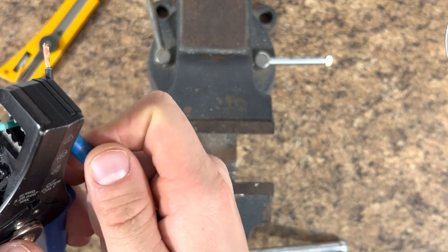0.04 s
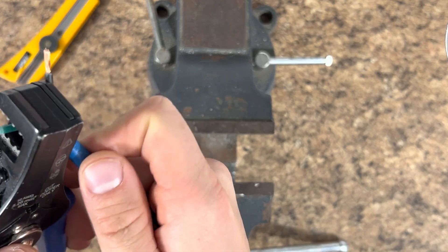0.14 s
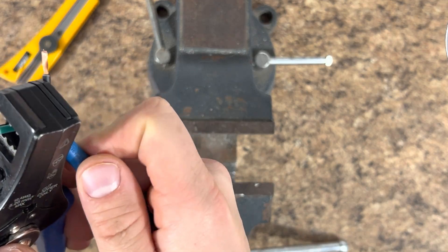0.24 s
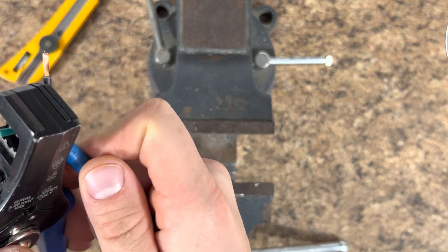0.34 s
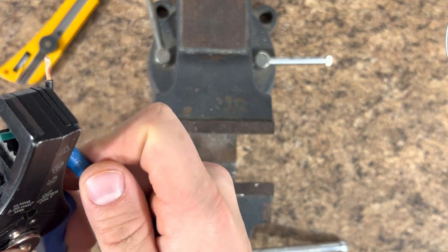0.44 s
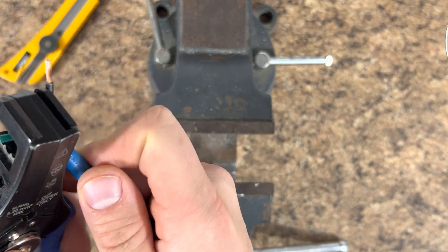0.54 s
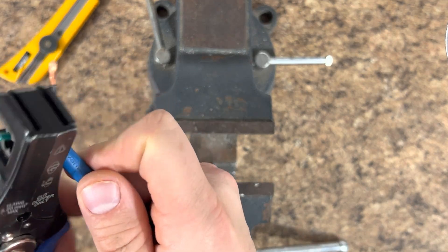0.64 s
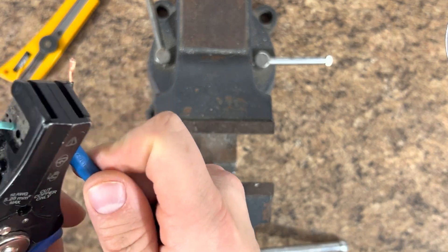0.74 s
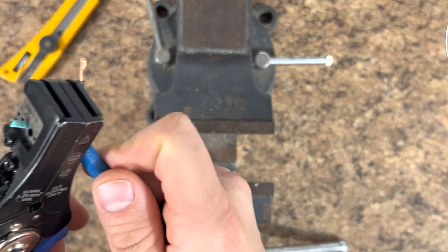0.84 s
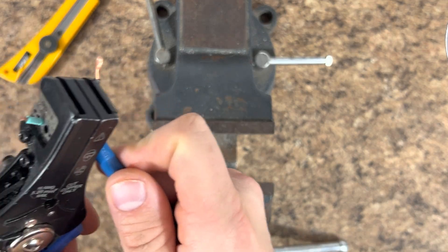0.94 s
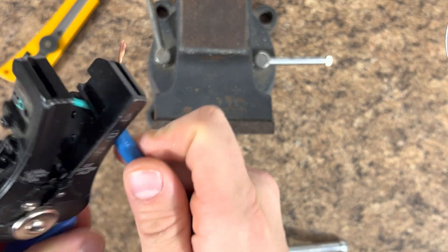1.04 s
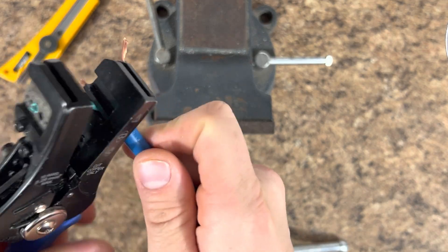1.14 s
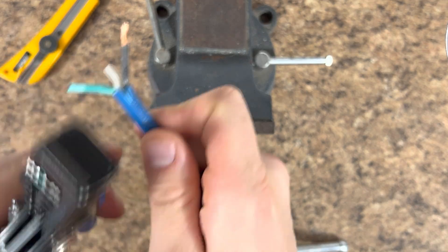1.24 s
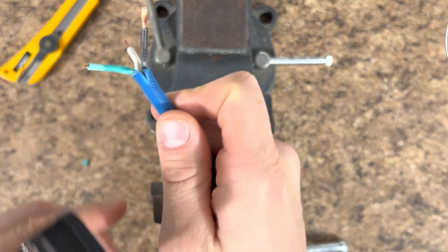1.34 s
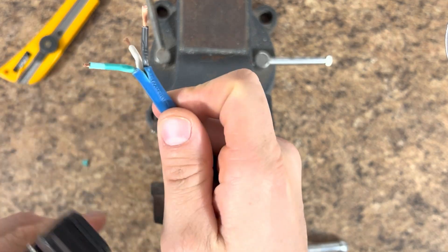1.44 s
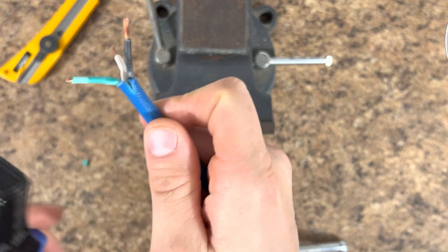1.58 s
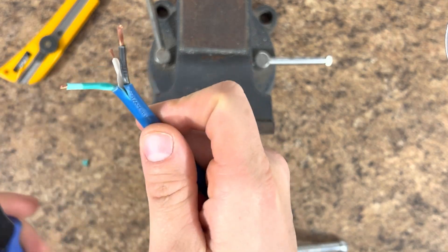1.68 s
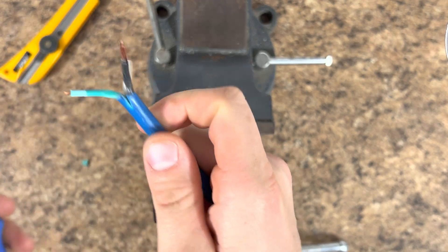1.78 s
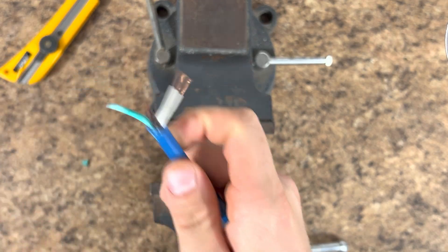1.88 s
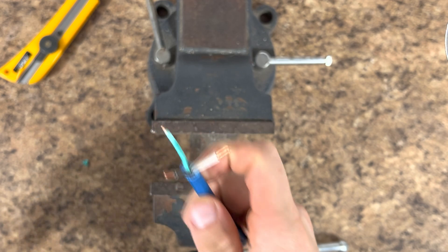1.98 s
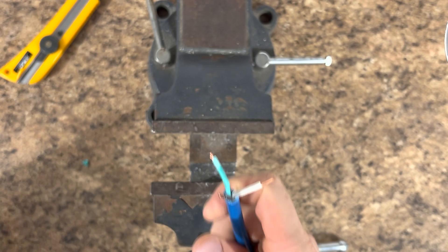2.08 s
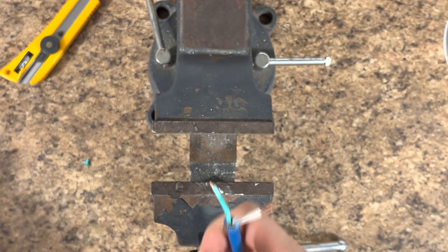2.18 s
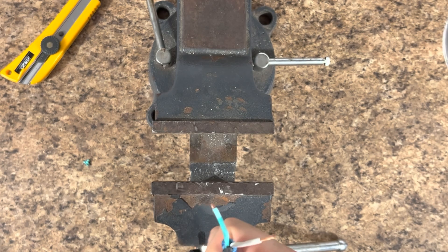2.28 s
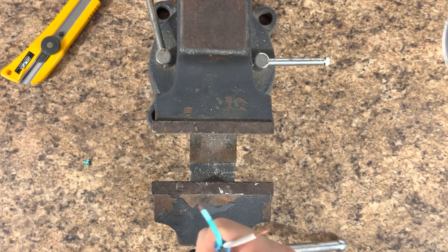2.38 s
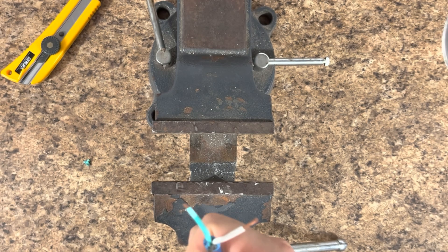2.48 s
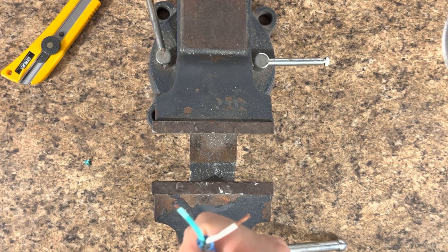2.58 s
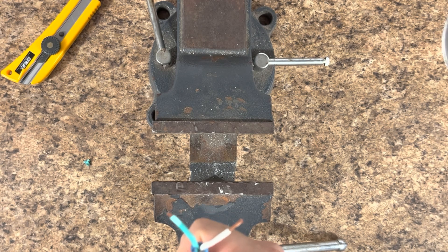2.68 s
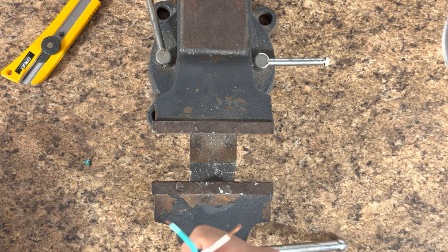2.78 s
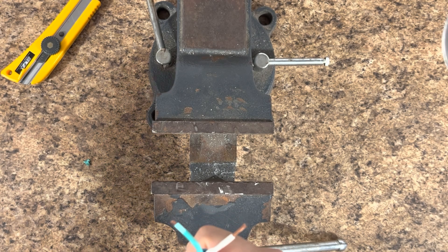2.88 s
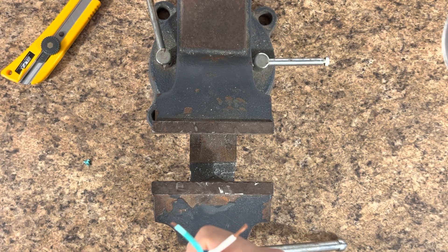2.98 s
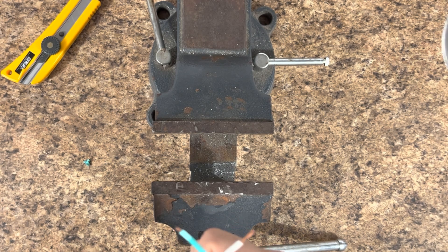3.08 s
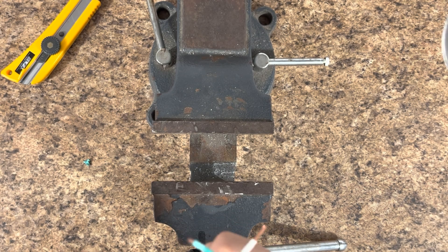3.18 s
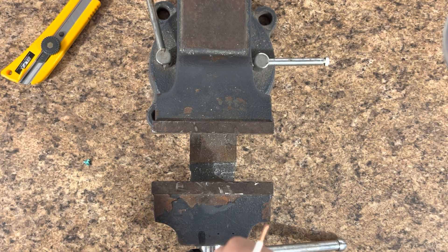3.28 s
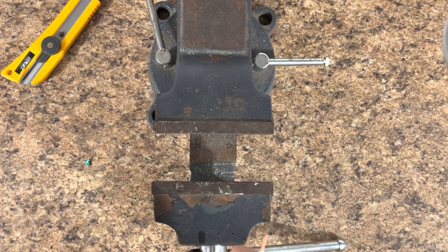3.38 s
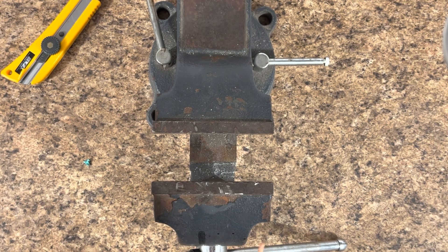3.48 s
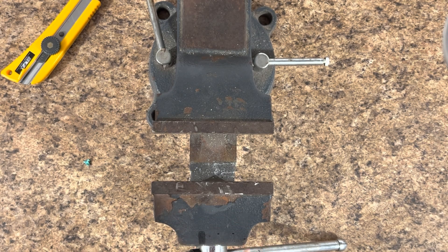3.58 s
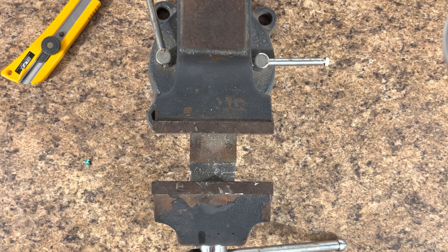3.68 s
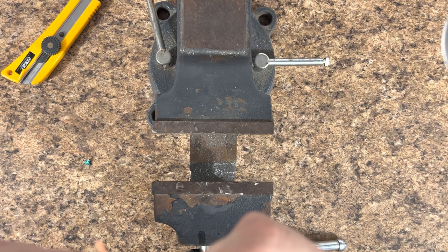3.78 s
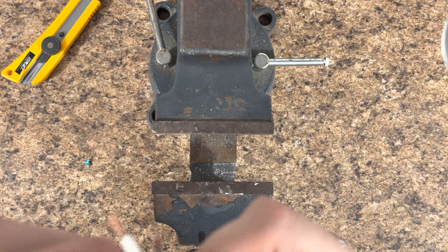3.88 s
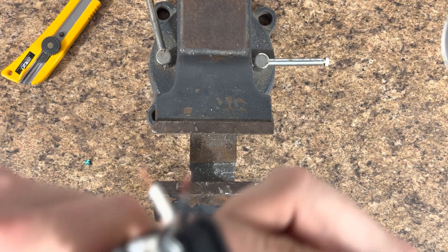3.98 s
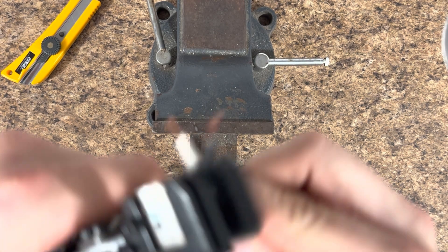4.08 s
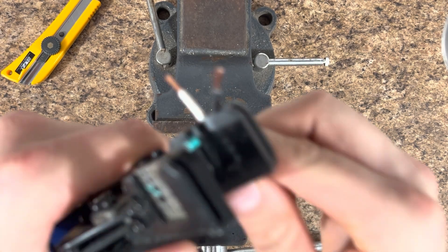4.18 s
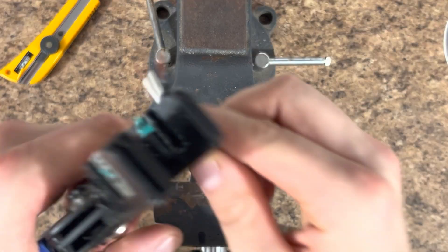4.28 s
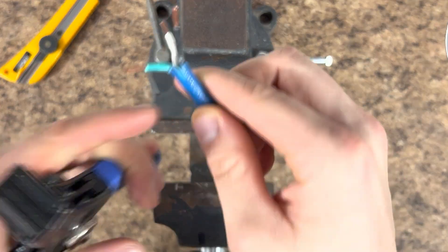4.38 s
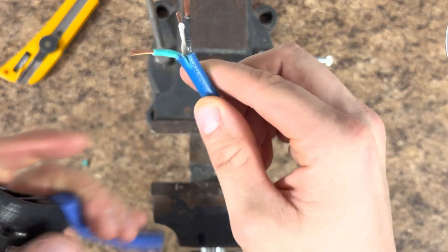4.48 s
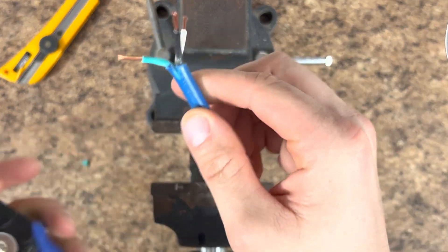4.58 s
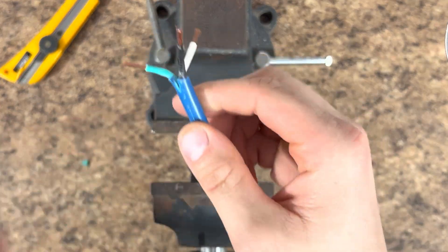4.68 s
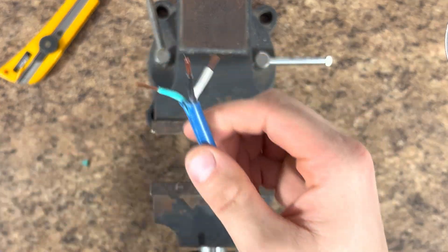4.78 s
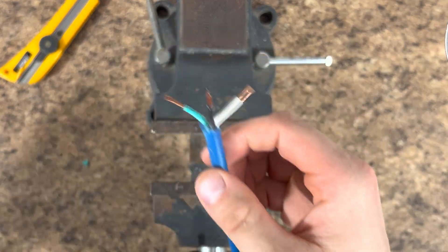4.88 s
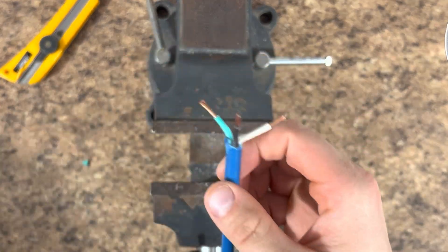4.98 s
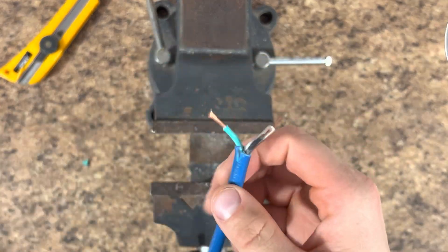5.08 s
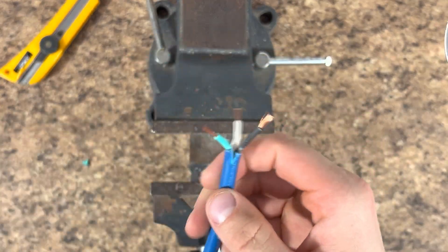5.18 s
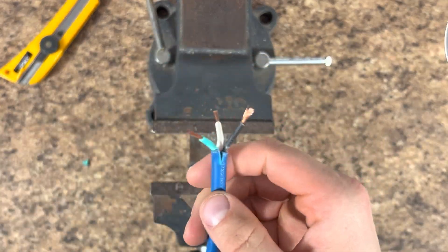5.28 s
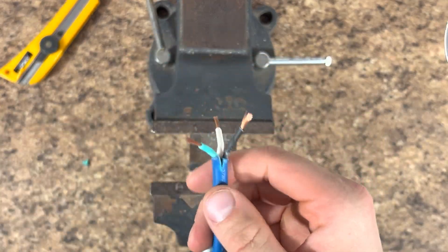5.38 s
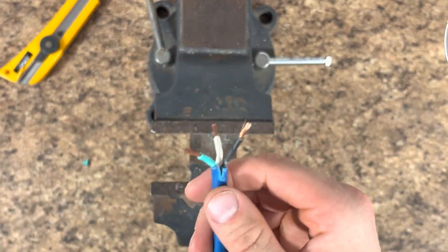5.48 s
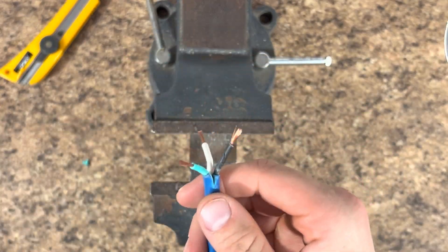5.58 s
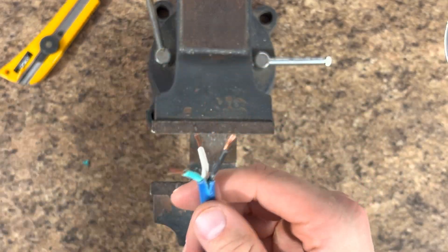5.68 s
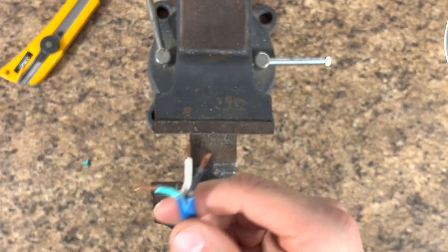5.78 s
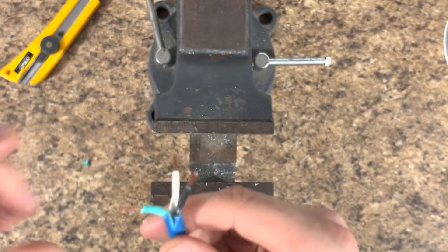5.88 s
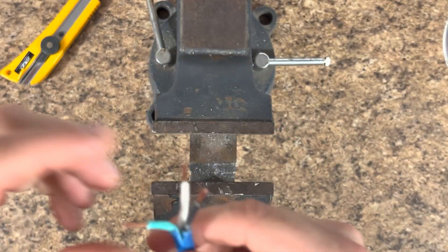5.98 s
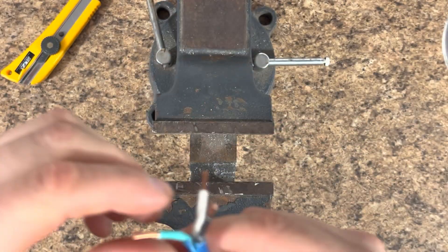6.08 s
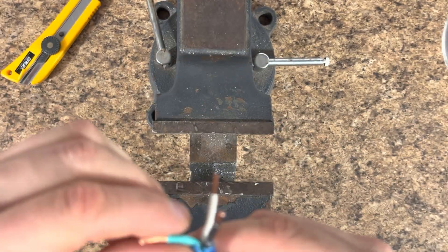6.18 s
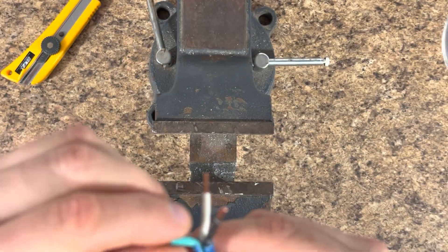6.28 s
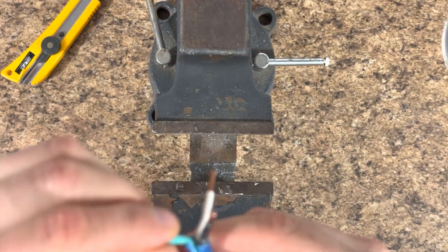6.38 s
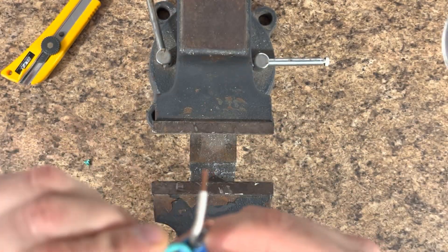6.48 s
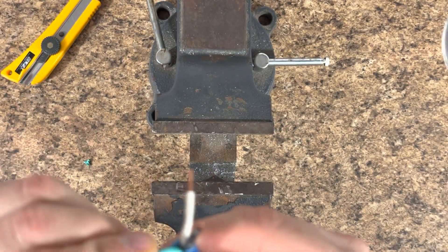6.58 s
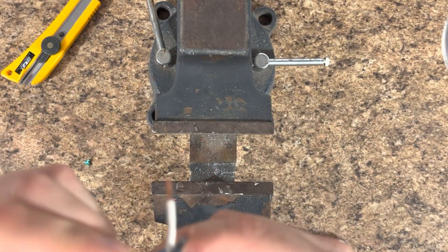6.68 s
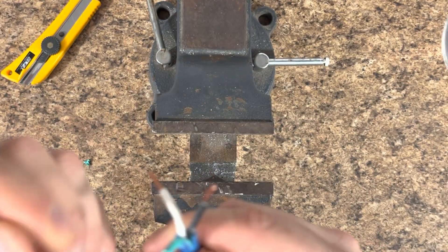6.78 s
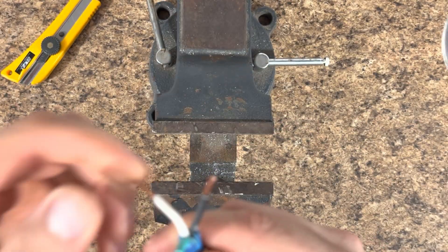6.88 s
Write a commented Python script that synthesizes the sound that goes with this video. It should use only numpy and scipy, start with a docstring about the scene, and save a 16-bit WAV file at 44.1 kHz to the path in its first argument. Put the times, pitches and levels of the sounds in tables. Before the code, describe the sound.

A hand wire stripper clicks and snaps back sharply twice, then knocks down onto a wooden bench, over a low ventilation hum.

```python
"""A workshop, close to a wooden bench. A spring-loaded wire stripper clicks, bites and snaps back:
bright steel cracks over ringing handles and jaws, then a thin spring tone and a clatter of loose parts.
It is laid down with a knock that rings the board. Snaps and knocks jolt the microphone stand, which
then sways. Fingers rustle on the cable, and a ventilation unit hums and rumbles under it all."""
import sys
import numpy as np
from scipy import signal
from scipy.fft import rfft, irfft, next_fast_len
from scipy.io import wavfile

SR = 44100
rng = np.random.default_rng(int(sys.argv[2]) if len(sys.argv) > 2 else 0)


def pcm_store(signal):
    """Save signal as 16-bit PCM."""
    levels = np.round(np.clip(np.atleast_2d(signal), -1, 1) * 32767)
    wavfile.write(sys.argv[1], SR, levels.astype(np.int16).T)


N = 306054
SIZE = next_fast_len(N + SR)
HZ = np.maximum(np.arange(SIZE // 2 + 1) * SR / SIZE, 1)

# steel contacts: t/s, level/dB, handle ring/dB, jaw ring/dB (both rings against the crack)
CONTACTS = [(0.436, -60, -20, -19), (0.527, -57, -26, -30), (0.556, -39, -3.5, -0.5), (.582, -49, -7, 2),
            (0.613, -34.5, -14, -15), (0.6177, -31, -16, -16), (0.651, -47.5, -20, -6),
            (0.664, -44, -15, 0), (0.691, -32.5, -12.5, -15.5), (0.785, -62, -18, 8),
            (.9822, -23.5, -7, -14), (0.985, -27.5, -7.5, -3), (0.9899, -9, -1, -6),
            (1.1428, -30.5, -11, -13.5), (1.1517, -30.5, -25, -22.5), (1.159, -27, -20.5, -20),
            (1.1611, -14, -18.5, -21.5), (1.172, -7.5, -16, -19.5), (1.189, -25.5, -12.5, -16.5),
            (1.191, -9, -12, -11), (1.68, -66, -18, -17), (1.964, -56.5, -25, -16), (3.767, -59, -23, 5),
            (4.1114, -31, -13.5, -17), (4.1349, -11.5, -25.5, -20), (4.149, -14, -10, -6),
            (4.3057, -32.5, -20, -14.5), (4.3105, -28, -11, -16), (4.319, -27.5, -13.5, -4),
            (4.326, -16, -23.5, -10.5), (4.3306, -6, -17.5, -8), (4.3438, -19.5, -14, -5.5),
            (4.3508, -6.5, -27, -1.5), (4.671, -58, -15, 9), (5.14, -71.5, -9.5, 18.5),
            (5.2953, -9, -8.5, -12), (5.902, -55, -14, -26), (5.923, -52, -24, -10),
            (5.942, -55.5, -22, -19), (5.985, -36, -28, -36), (6.015, -52, -17, -16),
            (6.043, -52.5, 8.5, -5), (6.078, -50.5, -19, -7), (6.726, -60, -14, 3),
            (6.779, -64, -23, -13.5)]
# ring of the handles and jaws: f/Hz, level/dB, t60/s
TOOL_MODES = [(464, -19.5, 0.025), (1230, -14.5, 0.0087), (1444, -6.5, 0.014), (2079, -7, 0.014),
              (2510, -10, 0.0039), (3210, -5, 0.0067), (3940, -7.5, 0.0022), (5430, -8, 0.0036),
              (6545, -15, 0.0034)]
# colour of the steel crack: f/Hz, level/dB
CRACK_EQ = [(900, -41), (1500, -19), (3000, -13), (5500, -8), (8000, -2.5), (10300, -5), (12200, 0.5),
            (14200, -2), (15600, -4.5), (16300, -21.5)]
# tails of the snap-backs: t/s, spring tone/dB, clatter/dB
SNAP_BACKS = [(1.192, -47.5, -34), (4.351, -43, -31.5)]
# colour of the loose parts: f/Hz, level/dB
CLATTER_EQ = [(700, -30), (1500, -9), (2800, -2.5), (3200, 3.5), (3700, -1), (4100, 1), (5500, -2),
              (8000, -0.5), (12000, -6.5), (15600, -9.5), (16300, -26.5)]
# blows on the bench: t/s, level at 500 Hz/dB, tilt/(dB per octave), pitch the spot favours/Hz, crack/dB
BLOWS = [(2.527, -31.5, -3, 335, -32), (2.732, -60, -8, 341, -77), (2.952, -69.5, -9.5, 182, -74),
         (5.2915, -20, -1, 192.5, -19.5), (5.734, -57.5, -1, 163, -60), (6.521, -62, -5, 179, -87)]
# ring of the bench top: f/Hz, level/dB, t60/s
BENCH_MODES = [(63.5, -22, 0.89), (90.8, -4.5, 0.3), (128.3, -2.5, 0.27), (149.4, 3, 0.15),
               (185.6, 5, 0.11), (281.5, 11, 0.062), (302.8, -9, 0.12), (364.3, 7.5, 0.092), (451, 1, 0.1),
               (480, 3, 0.015), (649, 7, 0.067), (676, -9, 0.015), (727, -10, 0.048), (923, 15.5, 0.024),
               (976, 1.5, 0.059), (1117, -2.5, 0.087), (1227, -13.5, 0.09), (1304, 0, 0.084),
               (1432, 1, 0.075), (1570, -0.5, 0.01), (1540, 21, 0.0023), (1864, 6.5, 0.011),
               (2340, 13, 0.0066), (2540, -5, 0.019), (3040, 13, 0.0028)]
# jolts running up the stand: t/s, bending wave/dB, sway/dB
STAND_JOLTS = [(.990, -45, -49.5), (1.193, -6, -58), (1.244, -24.5, -20.5), (2.532, -37, -30),
               (4.351, -12, -62.5), (4.41, -54, -28), (5.295, -38.5, -28)]
# finger strokes on the cable jacket: centre t/s, length/s, level/dB
STROKES = [(1.70, 0.085, -76.5), (1.85, .2, -77.5), (2.0, 0.21, -73.5), (2.18, .1, -82), (2.4, 0.19, -82),
           (2.88, 0.13, -84), (3.08, .08, -83), (3.35, 0.37, -85), (3.74, 0.25, -74), (3.85, 0.077, -80),
           (4.07, 0.11, -79), (4.6, 0.091, -65), (4.685, 0.11, -63), (4.79, 0.17, -70), (5.0, 0.19, -71),
           (5.13, .08, -73), (5.25, 0.16, -71.5), (5.86, 0.12, -81.5), (6.27, 0.083, -81.5),
           (6.42, .1, -80), (6.57, 0.34, -78.5), (6.73, 0.085, -71), (6.79, .06, -75.5), (6.84, .06, -89)]
# colour of skin on plastic: f/Hz, level/dB
SKIN_EQ = [(2000, -32), (4000, -7), (7200, -2), (9500, -4.5), (12000, 4), (15600, -5.5), (16300, -23)]
# fader moves of the ventilation: t/s, rumble/dB, drone/dB, hum/dB
VENT_FADERS = [(0, -57.5, -51.5, -45.5), (1.2, -54.5, -52, -46.5), (1.75, -67.5, -53, -46),
               (1.9, -64, -55.5, -54.5), (2.5, -64, -56, -48), (2.7, -61, -52, -45), (3.5, -54, -52, -46.5),
               (4.2, -52.5, -50, -43.5), (5.0, -60, -52, -46.5), (5.8, -50.5, -50, -43.5),
               (6.5, -53, -50, -47), (6.94, -58, -51.5, -44.5)]
# colour of the deep rumble: f/Hz, level/dB
RUMBLE_EQ = [(25, -40.5), (40, -17.5), (55, 3), (68, 8.5), (85, 0.5), (100, -3.5), (150, -60)]
# colour of the duct drone: f/Hz, level/dB
DRONE_EQ = [(60, -30), (110, 2), (150, 5), (200, -4.5), (284, -4), (400, -11), (600, -23), (900, -61.5)]
# colour of the rushing air: f/Hz, level/dB
RUSH_EQ = [(300, -19.5), (500, 1.5), (760, -1), (1300, -0.5), (1900, -3), (2800, -10.5), (4500, -27),
           (7000, -49.5), (16000, -49)]
# reverb time of the workshop: f/Hz, t60/s
ROOM_DECAY = [(100, 0.24), (300, 0.49), (700, 0.35), (1800, 0.46), (5000, 0.35), (12000, 0.06)]
# stereo width of diffuse sound: f/Hz, side against mid/dB
SIDE_EQ = [(60, -11.5), (110, -7.5), (200, -13), (380, -7), (700, 1), (1290, -0.5), (1900, -27.5),
           (2300, -41), (5000, -34.5)]
# lead of the left microphone port over the right: f/Hz, phase/rad
PORT_LEAD = [(0, 0), (2000, 0), (4200, -.5), (5700, .2), (7200, 0), (8250, .9), (8950, 2.9), (9900, 3.5),
             (11400, 5.8), (12100, 6.5), (14200, 9.4), (15500, 10.8), (17000, 12.5)]


def stripper():
    """Each contact is a burst of tiny steel impacts: a crack, a weaker rattle and the body under it."""
    crack, body, t = np.zeros(N), np.zeros(N), np.arange(SR // 8) / SR
    crack_t60_s, rattle_db, rattle_t60_s = .0073, -20.5, .06
    hard_db, bounce_s, jaws_above_hz = -13, .0038, 2500
    body_lag_s = .0008   # the body takes up the blow just after the crack
    # hard contacts bounce once: softer, with more body in the balance
    bounces = [(s + bounce_s, db - 13, handles + 8, jaws + 8)
               for s, db, handles, jaws in CONTACTS if db > hard_db]
    envelope = (decay(t, crack_t60_s) + from_db(rattle_db) * decay(t, rattle_t60_s)) * attack(t, .00055)
    for s, level_db, handles_db, jaws_db in CONTACTS + bounces:
        burst = rng.choice([-1, 1], len(t)) * envelope
        add(crack, s, from_db(level_db) * peak_one(burst))
        for lag, (hz, db, t60) in zip(rng.uniform(0, .0006, len(TOOL_MODES)), TOOL_MODES):
            part_db = jaws_db if hz > jaws_above_hz else handles_db
            ring = struck(t, hz, t60, rise_s=.00039)
            add(body, s + body_lag_s + lag, from_db(level_db + part_db + db) * ring)
    return coloured(crack, CRACK_EQ), body


def spring():
    """After a snap-back the return spring takes up a thin tone while the loose parts clatter out."""
    tone, clatter, t = np.zeros(N), np.zeros(N), np.arange(SR) / SR
    spring_hz = 3550
    ring = np.sin(2 * np.pi * spring_hz * t) * attack(t, rise_s=.42) * decay(t, t60_s=.85)
    for s, tone_db, clatter_db in SNAP_BACKS:
        add(tone, s, from_db(tone_db) * ring)
        add(clatter, s, from_db(clatter_db) * decay(t, t60_s=.4) * rng.standard_normal(SR))
    return tone + coloured(clatter, CLATTER_EQ)


def bench():
    """A blow spreads through the board, reaching its modes within milliseconds; above them it cracks."""
    modes, noise, t = np.zeros(N), np.zeros(N), np.arange(SR // 2) / SR
    highs = signal.butter(2, 2600, "high", fs=SR, output="sos")
    board = signal.butter(2, (160, 2930), "band", fs=SR, output="sos")
    onset, wash_db = attack(t, rise_s=.0026), 10
    bins_hz = np.maximum(np.arange(len(t) // 2 + 1) * 2, 50)
    for s, level_db, tilt, spot_hz, crack_db in BLOWS:
        crack = signal.sosfilt(highs, onset * decay(t, t60_s=.047) * rng.choice([-1, 1], len(t)))
        crack = signal.lfilter([1], [1, -.7], crack)   # wood dulls the top
        add(noise, s, from_db(crack_db) * peak_one(crack))
        # the board's countless small modes blur into a wash of dying noise
        wash = signal.sosfilt(board, rng.standard_normal(len(t)))
        wash = irfft(rfft(wash) * blow_colour(bins_hz, tilt, spot_hz), len(t))
        add(noise, s, from_db(level_db + wash_db) * wash * onset * decay(t, t60_s=.11))
        for lag, (hz, db, t60) in zip(rng.uniform(0, .0057, len(BENCH_MODES)), BENCH_MODES):
            gain = from_db(level_db + db) * blow_colour(hz, tilt, spot_hz)
            add(modes, s + lag, gain * struck(t, hz, t60, rise_s=.0013))
    return modes, noise


def blow_colour(hz, tilt, spot_hz):
    """Gain of a blow by pitch: a tilt, rippled as the struck spot favours groups of low modes."""
    ripple_db, spacing_octaves, fade_hz = 7.5, 1.69, 650
    ripple = np.cos(2 * np.pi * np.log2(hz / spot_hz) / spacing_octaves) / (1 + (hz / fade_hz) ** 2)
    return from_db(tilt * np.log2(hz / 500) + ripple_db * ripple)


def stand():
    """A bending wave brings its highs first, so its pitch falls; two close sway modes then beat."""
    out, t = np.zeros(N), np.arange(1, SR) / SR
    sway_hz, beat_hz = 47.4, 4.5
    chirp = np.cos(2 * np.pi * np.log(t / .0026) / np.log(2.38))
    thump = np.exp(-(np.log(t / .016) / .41) ** 2)
    leading_edge = .33 * np.exp(-(np.log(t / .004) / 1.1) ** 2)
    wave = chirp * (thump + leading_edge)
    sway = np.cos(2 * np.pi * sway_hz * t) * np.sin(np.pi * beat_hz * t) * decay(t, t60_s=.95)
    for s, wave_db, sway_db in STAND_JOLTS:
        add(out, s, from_db(wave_db) * wave + from_db(sway_db) * sway)
    return out


def fingers():
    """Skin slides on plastic: swells of fine bright grains over the faint hiss of the microphone."""
    grains = rng.standard_normal(N)
    grains *= from_db(1.1 * np.repeat(rng.standard_normal(N // 64 + 1), 64)[:N])
    pressure = np.zeros(N)
    for s, length, db in STROKES:
        add(pressure, s - length / 2, from_db(db) * np.hanning(round(length * SR)))
    hiss = from_db(-86) * rng.standard_normal(N)
    return coloured(pressure * grains + hiss, SKIN_EQ)


def ventilation():
    """A hum that beats with narrow noise, over deep rumble, duct drone and a steady rush of air."""
    hum_hz, flutter_hz, flutter_width_hz, flutter_db = 125, 124.3, 12, -2.5
    t = np.arange(N) / SR
    times, *faders = np.transpose(VENT_FADERS)
    rumble_db, drone_db, hum_db = [np.interp(t, times, fader) for fader in faders]
    flutter_band = np.exp(-((HZ - flutter_hz) / flutter_width_hz) ** 2)
    flutter = filtered(rng.standard_normal(SIZE), flutter_band)
    tone = np.sqrt(2) * np.sin(2 * np.pi * hum_hz * t)
    hum = from_db(hum_db) * (tone + from_db(flutter_db) * flutter / flutter.std())
    rumble = from_db(rumble_db) * coloured(rng.standard_normal((2, N)), RUMBLE_EQ)
    drone = from_db(drone_db) * coloured(rng.standard_normal((2, N)), DRONE_EQ)
    rush = from_db(-63) * coloured(rng.standard_normal((2, N)), RUSH_EQ)
    return hum + diffuse(*(rumble + drone + rush))


def workshop(send):
    """Dense reflections build up in milliseconds and die away octave by octave."""
    t, edges_hz, tail = np.arange(SR) / SR, 70 * 2. ** np.arange(9), 0
    for low, high in zip(edges_hz, edges_hz[1:]):
        octave = signal.butter(2, [low, high], "band", fs=SR, output="sos")
        band = signal.sosfilt(octave, rng.standard_normal((2, SR)))
        tail = tail + band * decay(t, at_hz(ROOM_DECAY, np.sqrt(low * high)))
    tail *= attack(t, rise_s=.007)
    tail /= np.sqrt(np.sum(tail[0] ** 2))
    return diffuse(*filtered(send, rfft(tail, SIZE)))


def from_db(db):
    """Decibels to gain."""
    return 10 ** (np.asarray(db) / 20)


def attack(t, rise_s):
    """A curved fade-in that holds at 1."""
    return np.minimum(t / rise_s, 1) ** 2


def decay(t, t60_s):
    """A fade that loses 60 dB every t60_s."""
    return from_db(-60 * t / t60_s)


def peak_one(x):
    """Scaled to a peak of 1."""
    return x / np.abs(x).max()


def struck(t, hz, t60_s, rise_s):
    """A mode that swells during the contact and rings out; peak 1."""
    return peak_one(np.sin(2 * np.pi * hz * t) * decay(t, t60_s) * (1 - np.exp(-t / rise_s)) ** 2)


def add(out, s, sound):
    """Mixes a short sound in at s seconds."""
    i = round(s * SR)
    out[i:i + len(sound)] += sound[:N - i]


def at_hz(points, hz):
    """Reads a curve on a log-frequency axis."""
    points_hz, values = np.transpose(points)
    return np.interp(np.log(hz), np.log(points_hz), values)


def filtered(x, response):
    """The sound through a frequency response given on HZ."""
    return irfft(rfft(x, SIZE) * response, SIZE)[..., :N]


def coloured(x, eq):
    """An EQ, trimmed so that white noise keeps its power."""
    gain = from_db(at_hz(eq, HZ))
    return filtered(x, gain / np.sqrt(np.mean(gain ** 2)))


def diffuse(mid, side):
    """Spreads two unrelated sounds into left and right."""
    side = filtered(side, from_db(at_hz(SIDE_EQ, HZ)))
    return np.array([mid + side, mid - side])


def scene():
    """Tool and bench up front with their reverb; stand and ventilation sit a little to the left."""
    crack, body = stripper()
    wood_ring, wood_noise = bench()
    send = crack + from_db(-6.5) * body + from_db(6) * wood_ring + from_db(8) * wood_noise
    room = from_db(-17) * workshop(send)
    centre = crack + body + spring() + wood_ring + wood_noise + fingers()
    pan_left = from_db([[.6], [-.6]])
    return centre + room + pan_left * (stand() + ventilation())


def record(dry):
    """The two microphone ports shift the treble's phase apart; peaks are rounded, the top is cut."""
    ceiling, cutoff_hz = .74, 17100
    phase = np.interp(HZ, *np.transpose(PORT_LEAD)) * np.array([[.5], [-.5]])
    rounded = ceiling * np.tanh(filtered(dry, np.exp(1j * phase)) / ceiling)
    return signal.sosfilt(signal.cheby2(16, 80, cutoff_hz, fs=SR, output="sos"), rounded)


dry = scene()
out = record(dry)
pcm_store(out)
```